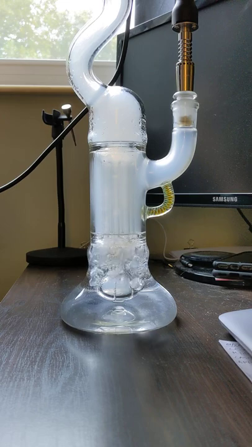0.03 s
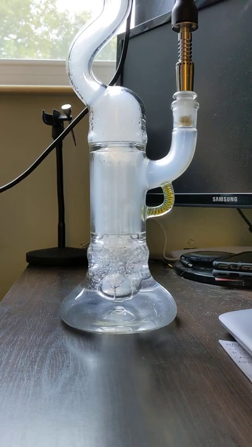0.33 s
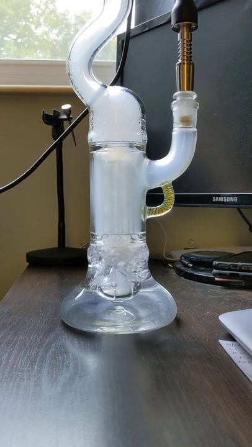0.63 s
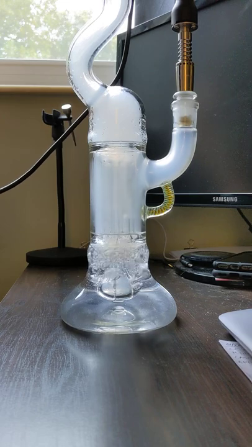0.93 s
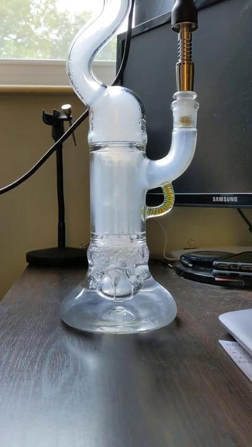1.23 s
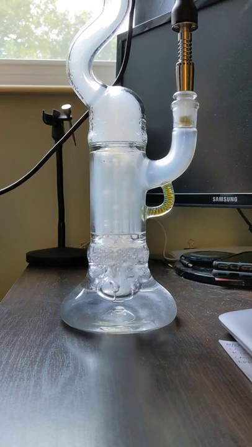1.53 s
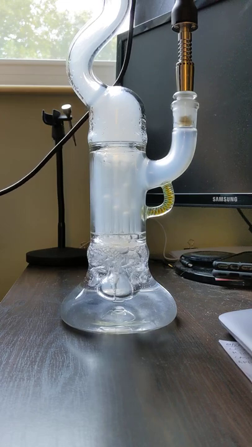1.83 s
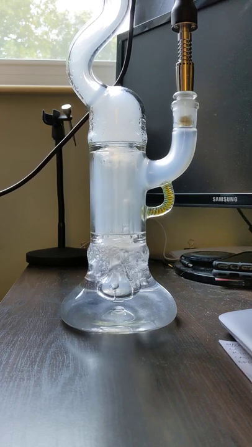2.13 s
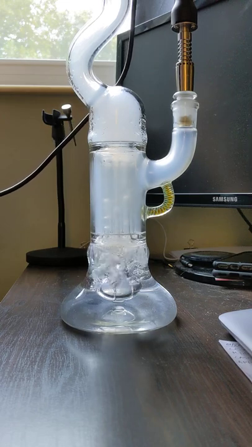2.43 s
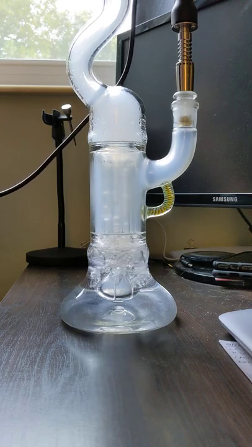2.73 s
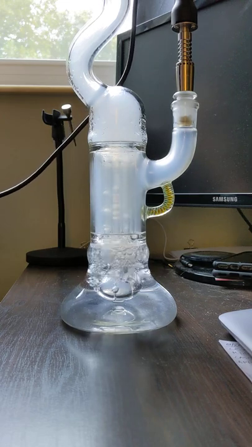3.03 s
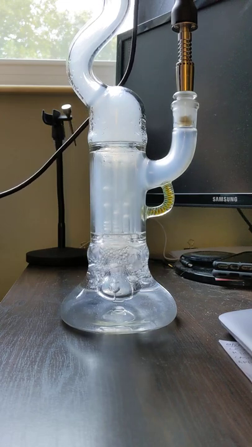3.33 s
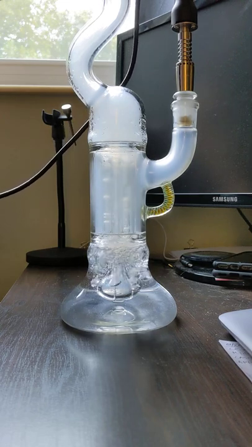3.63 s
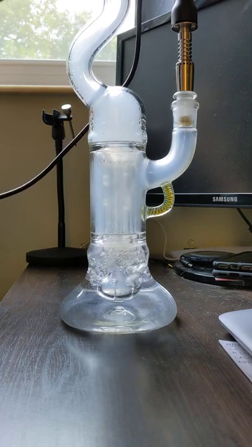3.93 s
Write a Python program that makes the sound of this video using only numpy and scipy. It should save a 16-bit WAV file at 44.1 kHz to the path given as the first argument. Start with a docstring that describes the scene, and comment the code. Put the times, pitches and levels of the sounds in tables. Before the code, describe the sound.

Water bubbles steadily in a glass pipe as air is drawn through it. Low, hollow gulps tumble throughout while small bubbles plink and spray ticks on the glass, heard close up in a quiet room.

```python
"""A glass water pipe bubbles as air is drawn steadily through it, on a desk in a quiet room.
Big air pockets gulp low in the chamber and the churning water sounds the pipe's air column.
Small bubbles plink as they burst, spray ticks on the glass and the tiniest bubbles fizz on top.
Close echoes and a short room tail surround it, over faint hum and hiss. The left microphone faces the pipe."""
import sys
import numpy as np
from scipy import signal
from scipy.fft import rfft, irfft
from scipy.io import wavfile

SR = 44100
rng = np.random.default_rng(int(sys.argv[2]) if len(sys.argv) > 2 else 0)


def materialize(psi):
    """Save the field psi as 16-bit PCM at rate SR to the path in sys.argv[1].

    A 1-D psi becomes a single channel; in a 2-D psi each row is a channel.
    """
    bounded = np.clip(np.atleast_2d(psi).T, -1, 1)
    quanta = np.round(bounded * 32767).astype(np.int16)
    wavfile.write(sys.argv[1], SR, quanta)


N = 176400
TIME = np.arange(N) / SR


# Big air pockets. Each row: start in seconds, relative level in dB, pitch in Hz at the top of the swell.
BIG_POCKETS = [(0.029,-46,168),(0.077,-43,224),(0.152,-44,150),(.19,-41,176),(0.326,-39,189),(0.458,-38,207),(0.52,-33.5,219),(.57,-56.5,122),(0.627,-61,178),(0.676,-44,198),(0.745,-34,188),(0.766,-40,116.3),(0.849,-36.5,217),(0.892,-39,149),(0.969,-43,139),(1.036,-35.5,169.6),(1.069,-38,162),(1.123,-40,212),(1.2,-41,190),(1.269,-37.5,197),(1.315,-38,185),(1.434,-35.5,172),(1.514,-37,129),(1.566,-34,210),(1.598,-38.5,165),(1.699,-50,172),(1.77,-37.5,149.5),(1.854,-34,183),(1.885,-34.5,156),(2.016,-37.5,117),(2.087,-56,174),(2.182,-35.5,216),(2.255,-38,173),(2.303,-35.5,135),(2.344,-35.5,157),(2.422,-39,179),(2.469,-38,140),(2.529,-35.5,223),(2.671,-33.5,166.7),(2.72,-38,188),(2.817,-33,139),(2.917,-35,207),(2.947,-35,175.4),(3.045,-31,174),(3.073,-41,151),(3.146,-45,226),(3.277,-31,169),(3.296,-33.5,188),(3.422,-40,133.4),(3.473,-35.5,219),(3.53,-42,146),(3.636,-36,129),(3.677,-36,185),(3.735,-37,180),(3.825,-39,206),(3.845,-34,172),(3.901,-34.5,141),(3.949,-30,175.5)]
# Middle-sized pockets. Each row: start in seconds, relative level in dB, starting pitch in Hz.
MID_POCKETS = [(.074,-44,650),(.107,-39,716),(.323,-43.5,368),(.741,-45,678),(.758,-56,680),(.802,-43,626),(1.113,-42.5,677),(1.464,-42.5,573),(1.527,-44,662),(1.666,-42.5,364),(1.756,-41.5,540),(1.996,-45.5,567),(2.249,-45.5,610),(2.418,-40.5,550),(2.546,-43.5,366),(2.657,-41.5,415),(2.672,-40.5,392),(2.7,-40,390),(2.814,-43,550),(3.078,-43,690),(3.144,-40,753),(3.276,-40.5,641),(3.585,-42,694),(3.641,-41,578),(3.727,-45,525),(3.772,-48,592)]

def gulps():
    """Big air pockets break from the stem with a gulp, and smaller ones glug between them."""
    swell_s, rise_per_s = 0.0078, 1.7
    out = np.zeros(N)
    for start, db, hz in BIG_POCKETS:
        start_hz = hz / (1 + rise_per_s * swell_s)
        add(out, start, from_db(db - 5.5) * bubble(start_hz, swell_s, rise_per_s))
    for start, db, hz in MID_POCKETS:
        add(out, start, from_db(db - 3) * bubble(hz, swell_s=0.0045, rise_per_s=1))
    return out


def bubble(hz, swell_s, rise_per_s):
    """A bubble's ring swells to 1 and dies, climbing by a share of its pitch per second."""
    t = TIME[:int(10 * swell_s * SR)]
    envelope = t / swell_s * np.exp(1 - t / swell_s)
    return envelope * np.sin(2 * np.pi * hz * (t + rise_per_s * t * t / 2))


def swarm(per_s, low_hz, high_hz, swell_cycles, rise, spread_db):
    """Bubbles at random times and pitches, each climbing by a share of its pitch as it swells."""
    out = np.zeros(N)
    sizes = clicks(per_s, spread_db)
    pitches = low_hz * (high_hz / low_hz) ** rng.random(N)
    for i in np.flatnonzero(sizes):
        swell_s = swell_cycles / pitches[i]
        add(out, i / SR, sizes[i] * bubble(pitches[i], swell_s, rise / swell_s))
    return out


# The hollow tone of the pipe's air column. Each row: pitch in Hz, width in Hz, gain in dB.
COLUMN_MODES = [(141.5,20,-5),(181.7,15.3,9),(223.7,10.9,5.5),(333,28,-12),(389.1,8,0.5),(448,17,-49),(544,25,-10.5),(645,36,-11.5),(681.4,10,-5)]

def churn(surge):
    """Tumbling water knocks on the air column, and middle-sized bubbles gurgle in it."""
    knocks = body(clicks(per_s=1000, spread_db=4.5) * stirring(), COLUMN_MODES)
    knocks = signal.sosfilt(signal.butter(3, 1000, fs=SR, output="sos"), knocks)
    gurgles = swarm(per_s=200, low_hz=383, high_hz=932, swell_cycles=0.82, rise=0.02, spread_db=3.0)
    flow = from_db(0.68 * surge)
    return from_db(-48) * rms_one(knocks * flow) + from_db(-62) * rms_one(gurgles * flow)


def stirring():
    """The churn's envelope: each gulp stirs the water, which settles back to a steady tumble."""
    settle_s, steady = 0.038, 3.7
    stirs = np.zeros(N)
    for start, db, _ in BIG_POCKETS:
        add(stirs, start, from_db(db / 2) * np.exp(-TIME[:SR // 2] / settle_s))
    return steady + rms_one(stirs)


# Bursting bubbles up front. Each row: start in seconds, pitch in Hz, relative level in dB.
BUBBLE_BURSTS = [(.048,1900,-42),(.075,2495,-22),(.086,970,-34.5),(.099,1640,-38),(.101,2010,-23),(.117,2020,-43),(.121,1050,-38),(.132,2660,-35.5),(.163,924,-44.5),(.171,2453,-54),(.201,2490,-37),(.215,1090,-41.5),(.288,930,-39.5),(.403,2230,-43),(.445,3284,-41.5),(.521,1106,-43.5),(.670,2040,-25.5),(.685,2380,-34.5),(.742,2030,-45),(.742,915,-42),(.782,2407,-42.5),(.803,2400,-46),(.812,980,-43),(.822,3360,-50.5),(.871,2305,-38.5),(.955,2500,-43.5),(1.028,1880,-32),(1.047,2290,-34.5),(1.088,2357,-24.5),(1.134,2140,-30.5),(1.169,2000,-41.5),(1.179,930,-34.5),(1.310,2690,-40),(1.331,2200,-41),(1.405,3600,-46),(1.451,2380,-37.5),(1.457,950,-44.5),(1.514,2550,-40.5),(1.581,3740,-46.5),(1.594,3520,-50.5),(1.675,2590,-43.5),(1.703,2080,-39.5),(1.726,935,-43),(1.741,3840,-47),(1.785,1860,-35),(1.806,2280,-32),(1.808,1068,-44),(1.901,1940,-30),(1.915,2210,-42),(1.947,2160,-42),(2.010,2100,-54),(2.041,2460,-44.5),(2.086,2000,-44),(2.163,1760,-38.5),(2.174,2490,-30.5),(2.214,1850,-39.5),(2.238,2080,-28),(2.410,2880,-40),(2.413,990,-45),(2.544,1850,-38),(2.544,3780,-40),(2.568,3600,-48),(2.569,950,-46),(2.615,1920,-37),(2.645,2427,-35),(2.666,3340,-50),(2.702,1450,-45),(2.774,2170,-39.5),(2.808,2450,-47),(2.844,1110,-44.5),(2.927,2080,-38),(2.985,3740,-50),(3.035,2320,-33.5),(3.044,1940,-32.5),(3.075,1053,-40),(3.109,2900,-39),(3.109,1182,-42.5),(3.245,3510,-46.5),(3.272,2240,-41.5),(3.302,2560,-41.5),(3.307,1080,-41.5),(3.387,2470,-53),(3.404,2610,-31.5),(3.404,1060,-32),(3.405,1900,-36.5),(3.457,2420,-43),(3.501,2150,-47),(3.569,2380,-40.5),(3.663,2266,-40),(3.687,2200,-38.5),(3.702,3580,-42.5),(3.721,2543,-34.5),(3.762,3460,-41),(3.770,940,-45),(3.775,2510,-34.5),(3.821,2530,-38.5),(3.902,2470,-31),(3.983,1150,-42.5)]
# EQ for the crowd of small bubbles behind them. Each row: frequency in Hz, gain in dB.
CROWD_EQ = [(750,-1),(1050,6.5),(1400,-6),(1650,0),(1950,9),(2500,4.5),(3300,-1),(4200,-1)]

def plinks(surge):
    """Bubbles burst over a crackling crowd; the smaller the bubble, the more its film's snap stands out."""
    snap_hz, snap_db_per_octave = 2400, 14
    out = np.zeros(N)
    for start, hz, db in BUBBLE_BURSTS:
        add(out, start, from_db(db + 1.5) * plink(hz))
        snap_db = db - 10.5 + snap_db_per_octave * np.log2(hz / snap_hz)
        add(out, start, from_db(snap_db) * burst(snap_hz, width_hz=600, t60_s=0.028))
    crowd = swarm(per_s=600, low_hz=844, high_hz=3750, swell_cycles=0.95, rise=0.037, spread_db=4.5)
    crowd = colour(crowd, CROWD_EQ) * from_db(2.13 * surge)
    return out + from_db(-58) * rms_one(crowd)


def plink(hz, swell_s=0.0005, ring_s=0.0033, rise_per_s=1):
    """A burst bubble rings up at once, holds for a few cycles and is choked as it collapses."""
    t = TIME[:SR // 40]
    envelope = (1 - np.exp(-(t / swell_s) ** 2)) * np.exp(-(t / ring_s) ** 2)
    return envelope * np.sin(2 * np.pi * hz * (t + rise_per_s * t * t / 2))


def burst(hz, width_hz, t60_s):
    """A gritty snap of noise around a pitch: instant attack, then a fade."""
    t = TIME[:SR // 4]
    grit = rng.standard_normal(len(t)) ** 3
    band = resonate(resonate(grit, hz, width_hz), hz, 2 * width_hz)
    return rms_one(band) * from_db(-60 * t / t60_s)


# Spray hitting the glass. Each row: start in seconds, pitch in Hz, relative level in dB.
SPRAY_HITS = [(0.098,6000,-41),(.122,6600,-41),(.202,4140,-43),(.444,3180,-44),(.822,3300,-49.5),(1.405,3500,-54),(3.109,3200,-54),(3.243,3380,-49),(3.403,3300,-38.5),(.303,6800,-34),(0.434,9200,-52),(.496,5450,-46.5),(0.607,7340,-54),(.704,6700,-42),(.72,6800,-45),(0.78,7100,-40),(0.804,8200,-46.5),(.857,6860,-39),(0.917,6870,-45),(.96,6700,-62),(1.094,6200,-46),(1.126,6500,-45),(1.153,7800,-44),(1.173,7900,-55),(1.212,7950,-44.5),(1.244,6700,-54),(1.309,6240,-33),(1.310,5250,-37),(1.309,3560,-42),(1.635,6300,-53),(1.691,6350,-46),(1.78,7600,-49),(1.905,6300,-51),(1.934,5700,-50),(2.085,5730,-49.5),(2.175,5940,-37.5),(2.256,6260,-52),(2.325,4860,-44),(2.445,6800,-44.5),(2.475,6760,-60),(2.514,6200,-36.5),(2.514,4040,-50),(2.543,4180,-32.5),(2.559,9500,-46),(2.563,6140,-42),(2.647,5970,-45),(2.662,5870,-40),(2.745,7230,-39),(2.774,7200,-46),(2.811,4400,-43),(3.035,7150,-42.5),(3.11,8400,-49),(3.249,5420,-61),(3.257,8300,-47),(3.46,4940,-46),(3.569,6480,-42),(3.672,6200,-51),(3.732,6800,-39.5),(3.816,6200,-42.5),(3.903,6260,-50)]
# EQ for the spray. Each row: frequency in Hz, gain in dB.
SPRAY_EQ = [(2500,-12),(3600,7),(4700,-12),(6300,0.5),(7800,-3),(9000,-5),(12000,1),(16000,-33)]
# The bright ring of the glass wall. Each row: pitch in Hz, width in Hz, gain in dB.
WALL_MODES = [(5116,300,18),(5580,110,1),(6155,47,10),(6225,15,8),(6835,30,7.5),(7810,160,13.5),(8750,120,10.5)]

def spray(surge):
    """Each splash cracks, then spatters; with a fine rain of drops it sets the glass wall ringing."""
    splashes = np.zeros(N)
    for start, hz, db in SPRAY_HITS:
        patter = burst(hz, width_hz=670, t60_s=0.038)
        clumps = rms_one(from_db(4.5 * drift(per_s=308)[:len(patter)]))
        add(splashes, start, from_db(db + 0.5) * patter * clumps)
        crack = burst(hz, width_hz=2300, t60_s=0.01)
        add(splashes, start, from_db(db - 2.5) * crack)
    drops = swarm(per_s=210, low_hz=3930, high_hz=9260, swell_cycles=1.0, rise=0.0039, spread_db=6)
    drops = from_db(-62) * rms_one(drops * from_db(4.2 * surge))
    hits = colour(splashes + drops, SPRAY_EQ)
    return hits + from_db(-11.5) * body(hits, WALL_MODES)


# The tiniest bubbles cracking. Each row: start in seconds, pitch in Hz, relative level in dB.
TINY_CRACKS = [(.288,12600,-58),(1.276,10200,-54.5),(1.418,15100,-61),(1.532,13300,-55),(1.643,12800,-62),(1.683,13000,-60),(1.782,13000,-63),(1.81,13600,-68),(1.941,11800,-61),(1.972,13200,-64),(2.000,13200,-58.5),(2.086,10600,-69),(2.276,12300,-54),(2.639,14600,-64),(2.803,11100,-57),(2.972,14200,-57),(3.270,12400,-61),(3.733,14300,-59)]

def ticks():
    """The tiniest bubbles snap over a steady fizz and ring on in glass and room, mostly on the right."""
    fizz = swarm(per_s=110, low_hz=10300, high_hz=15600, swell_cycles=2.4, rise=0, spread_db=10)
    direct = from_db(-80.5) * rms_one(fizz)
    for start, hz, db in TINY_CRACKS:
        add(direct, start, from_db(db + 5.5) * burst(hz, width_hz=1200, t60_s=0.027))
    tail = room_tail(direct + body(direct, WALL_MODES))
    return stereo_gain(-12.5, 0) * (direct + from_db(-1) * tail)


# The room's standing waves. Each row: pitch in Hz, width in Hz, left gain, right gain.
ROOM_MODES = [(56.4,6.7,0.99,-0.44),(78,40,1.7,-0.41),(132.2,27.4,1.15,0.079),(170.4,32,-2.27,1)]

def low_paths(x):
    """The bass sits in the centre, widened by the room's standing waves and tail."""
    waves = sum(np.outer([left, right], resonate(x, hz, width)) for hz, width, left, right in ROOM_MODES)
    return x + waves + from_db(-9.5) * room_tail(x)


# Early reflections off nearby surfaces. Each row: delay in seconds, left gain, right gain.
REFLECTIONS = [(.0003,0.12,0.23),(.00293,1,0.29),(.0085,0.044,0.29),(0.013,0.3,0.068),(0.0146,0.11,0.05)]
# The ring of the glass chamber. Each row: pitch in Hz, width in Hz, gain in dB.
CHAMBER_MODES = [(1087,90,-2),(1801,75,14.5),(1838,39,4),(2794,70,18),(3415,210,24)]

def bright_paths(x):
    """The treble arrives dry on the left; its echoes and a tail with the chamber's ring reach both sides."""
    early = np.array([x, np.zeros(N)])
    for delay_s, left, right in REFLECTIONS:
        delayed = np.pad(x, (int(delay_s * SR), 0))[:N]
        early += np.outer([left, right], delayed)
    ringing = x + from_db(-2.5) * body(x, CHAMBER_MODES)
    return early + stereo_gain(-10, -12) * room_tail(ringing)


def spray_paths(x):
    """The spray is heard largely by way of the room, and louder on the left."""
    return stereo_gain(-7, -20.5) * x + stereo_gain(-2, -9.5) * room_tail(x)


def room_tail(x, t60_s=0.2):
    """The room's short diffuse decay, unrelated at the two microphones."""
    t = TIME[:SR // 2]
    tail = rng.standard_normal((2, len(t))) * from_db(-60 * t / t60_s)
    tail /= np.sqrt(np.sum(tail ** 2, axis=1, keepdims=True))
    return signal.fftconvolve(x[None], tail, axes=1)[:, :N]


# The bed of hum and hiss. Each row: frequency in Hz, left and right density in dB per Hz.
ROOM_TONE_SPECTRUM = [(19.7,-106,-101),(42.3,-114,-104),(56,-76.5,-93),(108,-82,-78.5),(330,-95,-105.5),(1120,-101,-102),(4200,-111,-112),(10700,-116,-112),(12700,-120,-108),(15700,-121,-108)]

def room_tone():
    """Faint room hum and microphone hiss, a separate noise on each side."""
    rows = np.array(ROOM_TONE_SPECTRUM)
    sides = [colour(rng.standard_normal(N), rows[:, [0, side]]) for side in (1, 2)]
    return np.array(sides) * np.sqrt(SR / 2)


def from_db(db):
    """Decibels to gain."""
    return 10 ** (np.asarray(db) / 20)


def stereo_gain(left_db, right_db):
    """A fader for each side."""
    return from_db([[left_db], [right_db]])


def rms_one(x):
    """Scale to rms 1."""
    return x / np.sqrt(np.mean(x ** 2) + 1e-20)


def colour(x, curve):
    """Minimum-phase EQ through (Hz, dB) points joined on a log-frequency axis."""
    size = 2 * N
    hz, db = np.transpose(curve)
    bin_hz = np.arange(N + 1) * SR / size
    bin_db = np.interp(np.log(bin_hz + 1e-9), np.log(hz), db)
    cepstrum = irfft(np.log(from_db(bin_db)))
    cepstrum[1:N] *= 2  # folded forward, so nothing rings ahead of a hit
    cepstrum[N + 1:] = 0
    return irfft(rfft(x, size) * np.exp(rfft(cepstrum)))[..., :N]


def resonate(x, hz, width_hz):
    """One resonance with gain 1 at its peak."""
    radius = np.exp(-np.pi * width_hz / SR)
    feedforward = np.array([1, 0, -1]) * (1 - radius * radius) / 2
    feedback = [1, -2 * radius * np.cos(2 * np.pi * hz / SR), radius * radius]
    return signal.lfilter(feedforward, feedback, x + 1e-18)


def body(x, modes):
    """A ringing body: resonances in parallel."""
    return sum(from_db(db) * resonate(x, hz, width) for hz, width, db in modes)


def drift(per_s):
    """A wobble of rms 1 that glides between random values."""
    knots = rng.standard_normal(1000)
    return rms_one(np.interp(TIME * per_s, np.arange(len(knots)), knots))


def clicks(per_s, spread_db):
    """Random impulses of uneven size."""
    sizes = from_db(spread_db * np.clip(rng.standard_normal(N), -2, 2))
    signs = rng.choice([-1, 1], N)
    return sizes * signs * (rng.random(N) < per_s / SR)


def add(out, start_s, sound):
    """Mix a sound in at a time."""
    i = int(np.clip(start_s * SR, 0, N - 1))
    out[i:i + len(sound)] += sound[:N - i]


def scene():
    """The bubbling pipe in its room; one surging air flow swells the churn, the crowd and the drops."""
    surge = drift(per_s=24)
    lows = low_paths(gulps() + churn(surge))
    mids = bright_paths(plinks(surge))
    highs = spray_paths(spray(surge)) + ticks()
    return lows + mids + highs + room_tone()


def record(dry):
    """A low cut trims the deepest bass and a steep high cut takes off the very top."""
    low_cut = signal.butter(3, 41, "high", fs=SR, output="sos")
    high_cut = signal.ellip(12, .1, 80, 15900, fs=SR, output="sos")
    return signal.sosfilt(high_cut, signal.sosfilt(low_cut, dry))


dry = scene()
out = record(dry)
materialize(out)
```